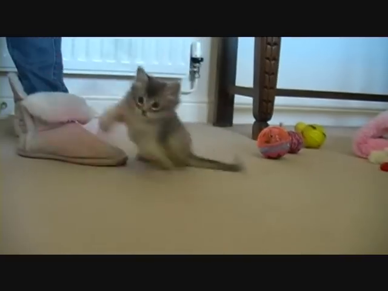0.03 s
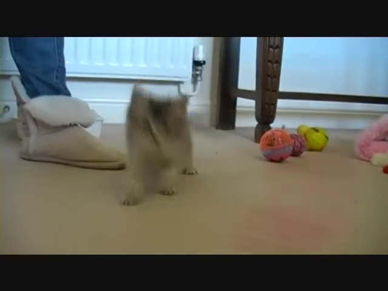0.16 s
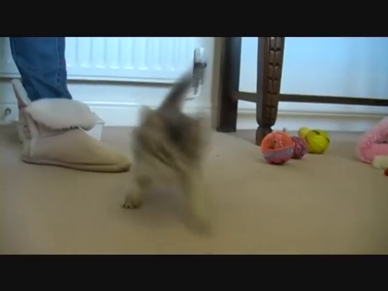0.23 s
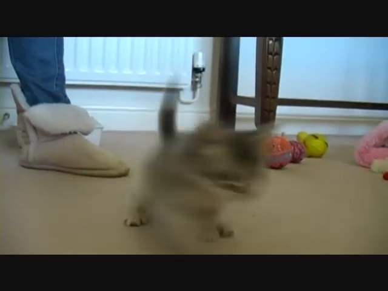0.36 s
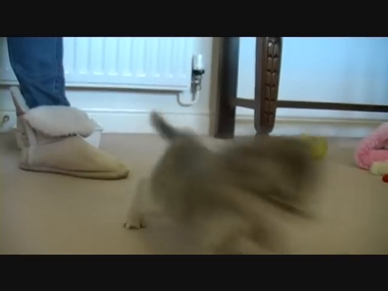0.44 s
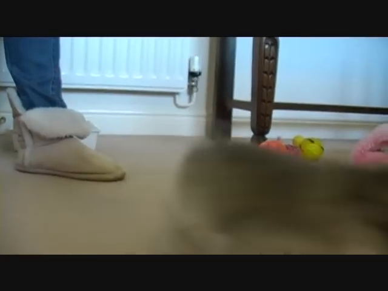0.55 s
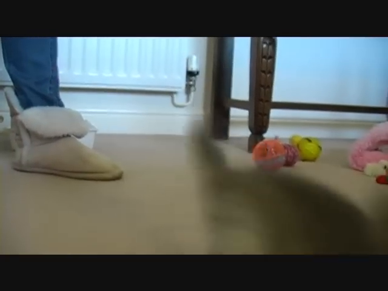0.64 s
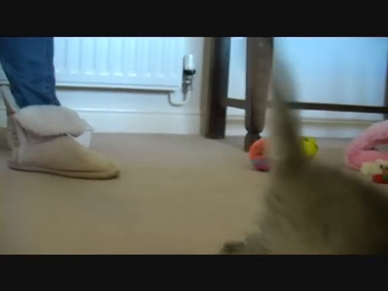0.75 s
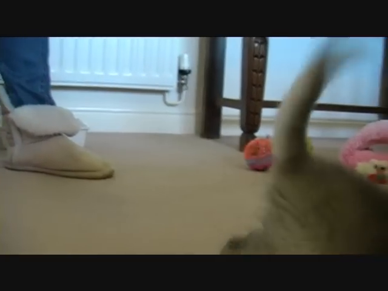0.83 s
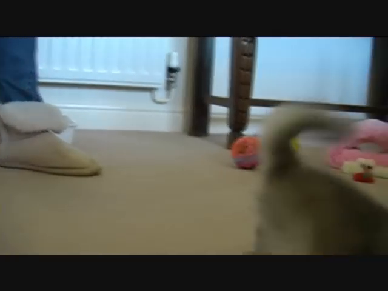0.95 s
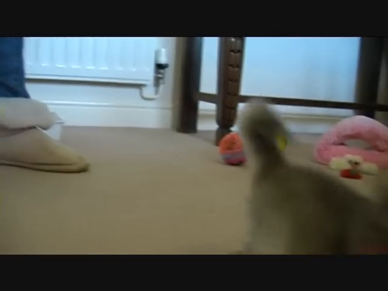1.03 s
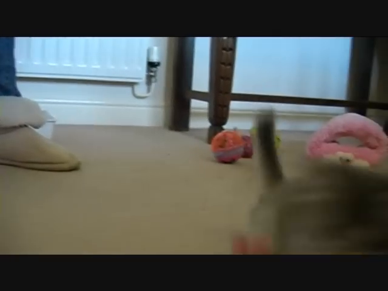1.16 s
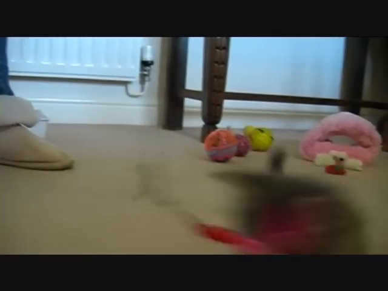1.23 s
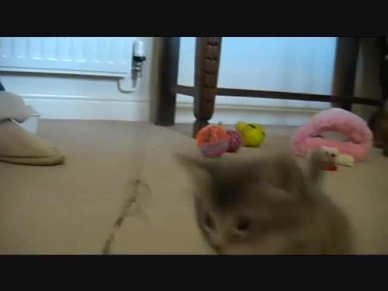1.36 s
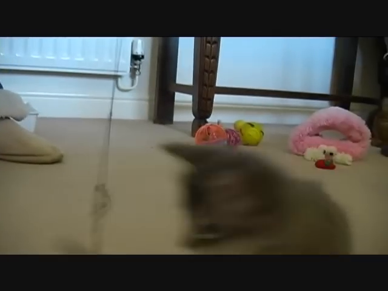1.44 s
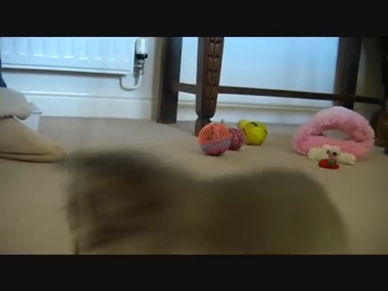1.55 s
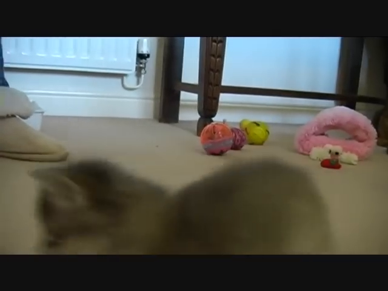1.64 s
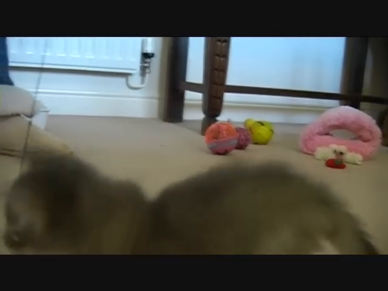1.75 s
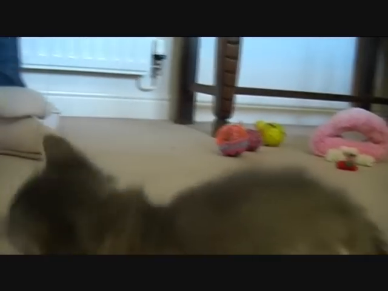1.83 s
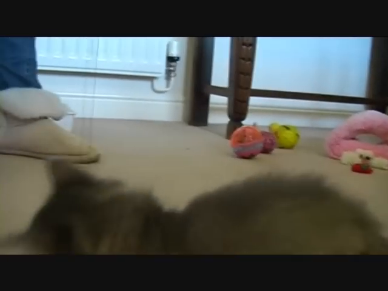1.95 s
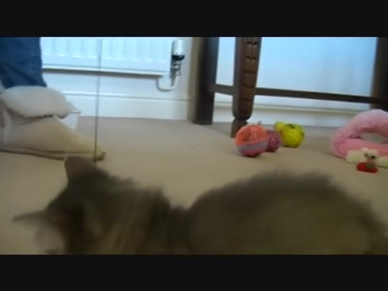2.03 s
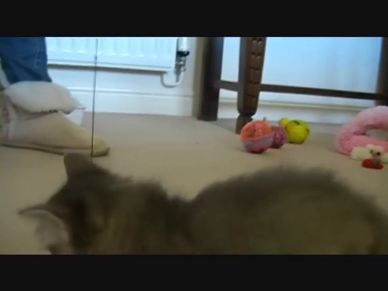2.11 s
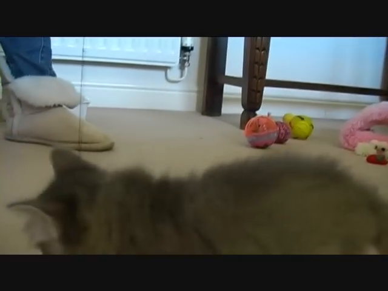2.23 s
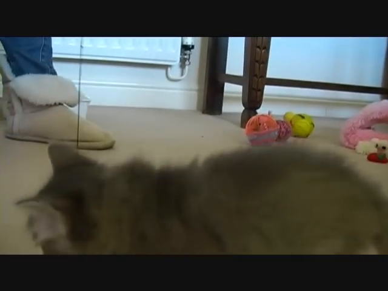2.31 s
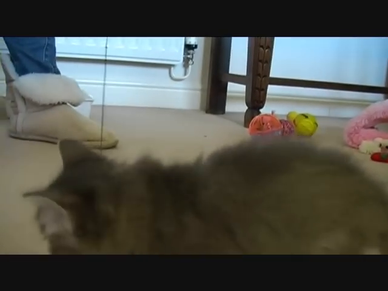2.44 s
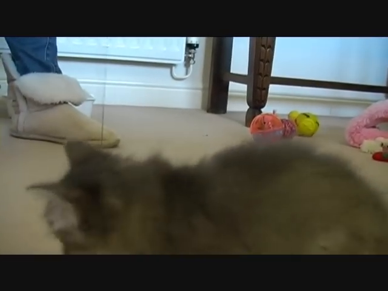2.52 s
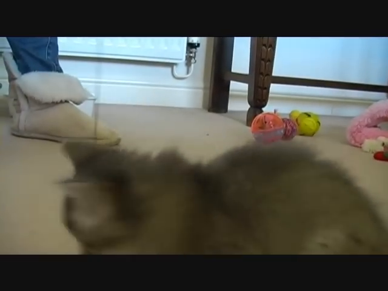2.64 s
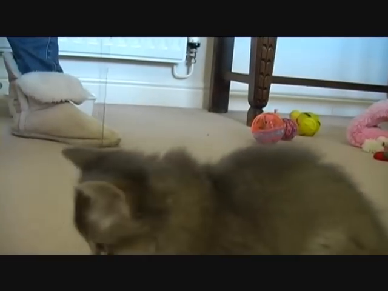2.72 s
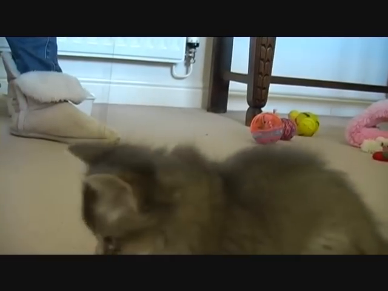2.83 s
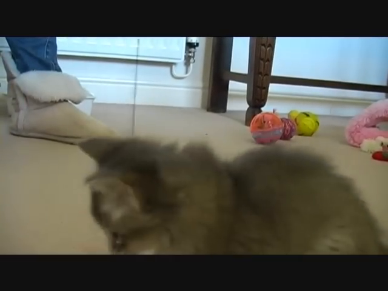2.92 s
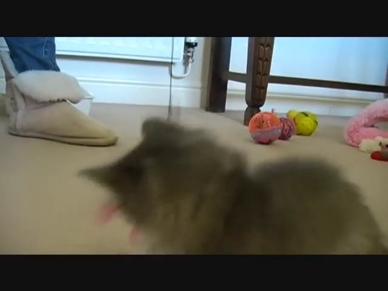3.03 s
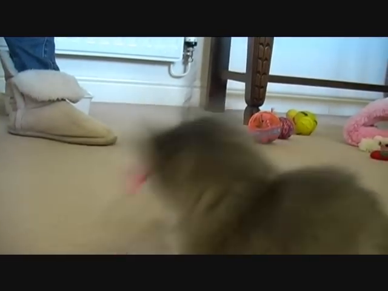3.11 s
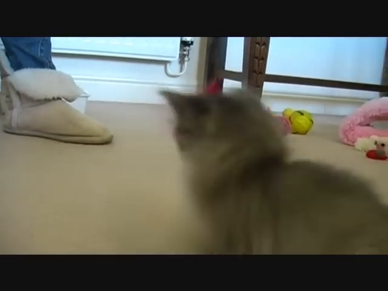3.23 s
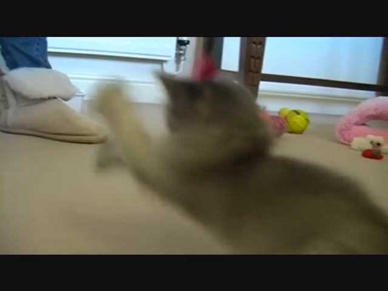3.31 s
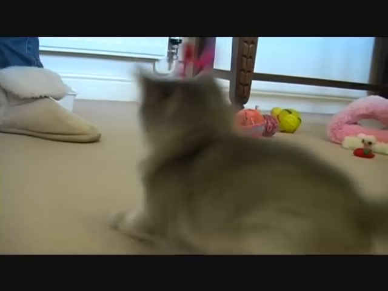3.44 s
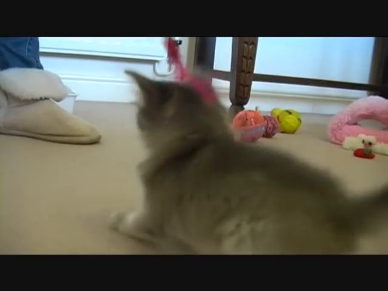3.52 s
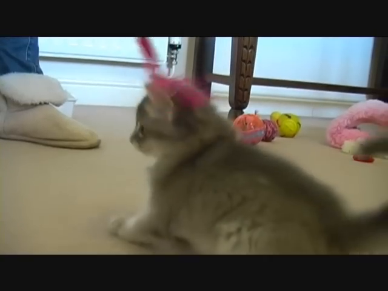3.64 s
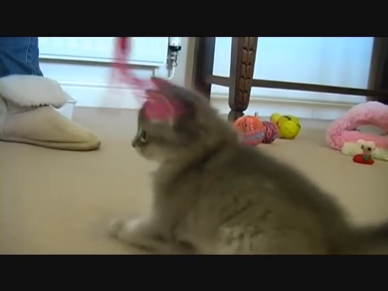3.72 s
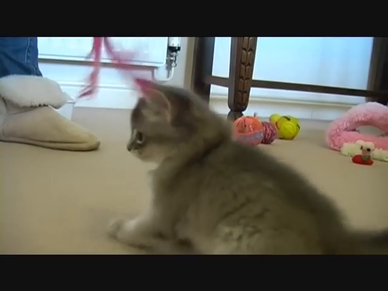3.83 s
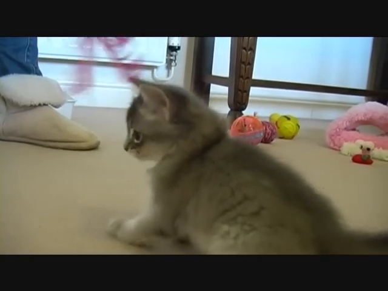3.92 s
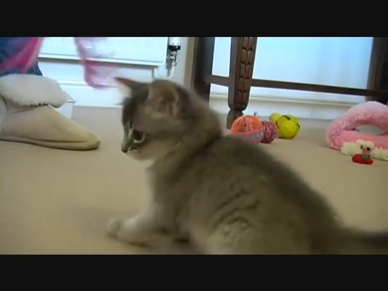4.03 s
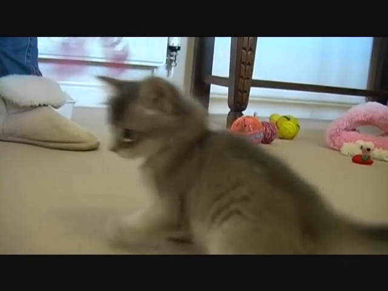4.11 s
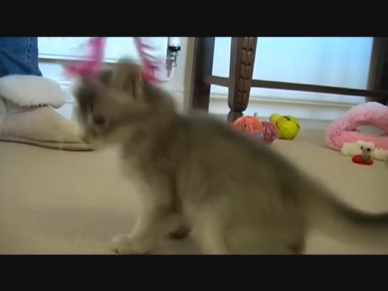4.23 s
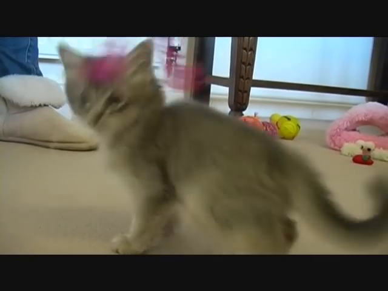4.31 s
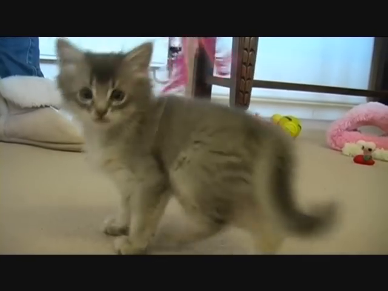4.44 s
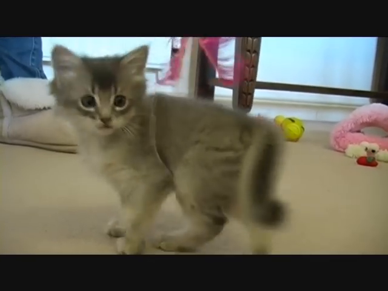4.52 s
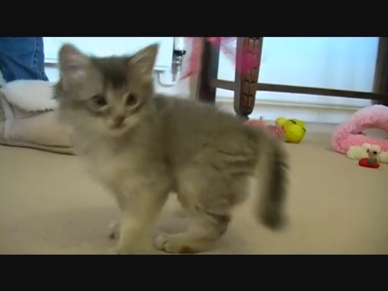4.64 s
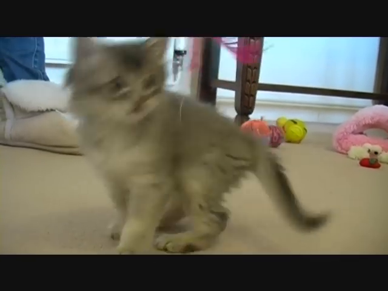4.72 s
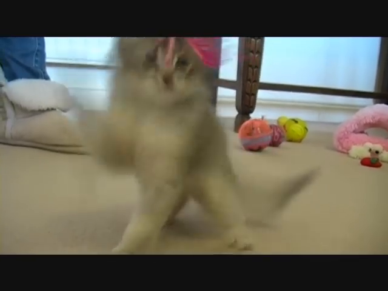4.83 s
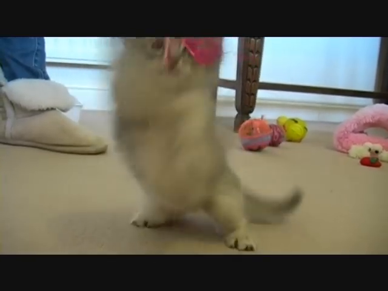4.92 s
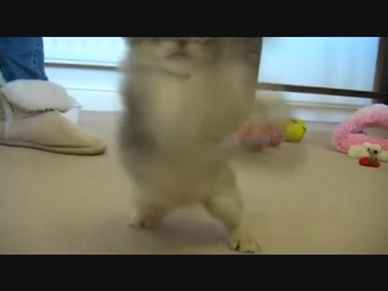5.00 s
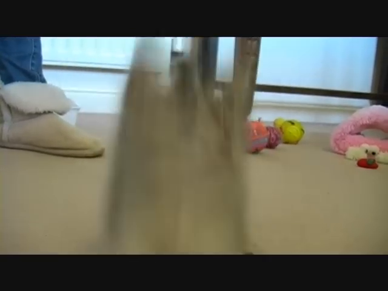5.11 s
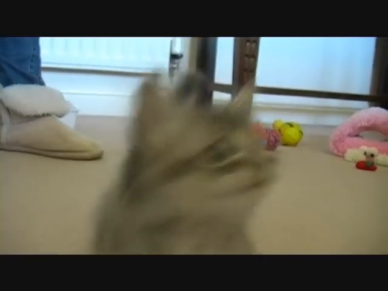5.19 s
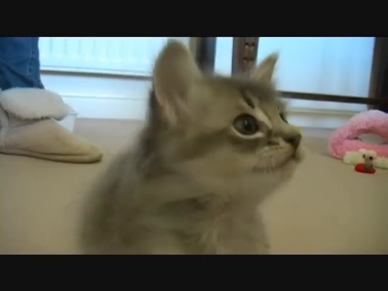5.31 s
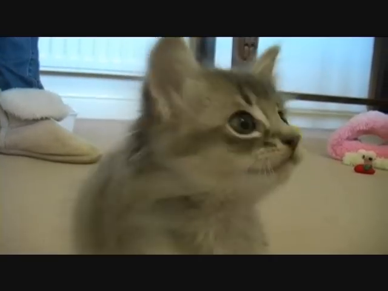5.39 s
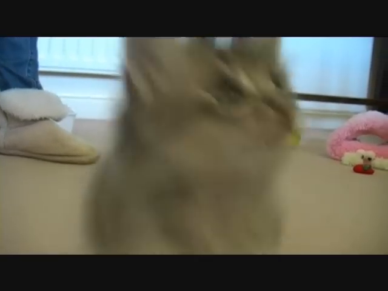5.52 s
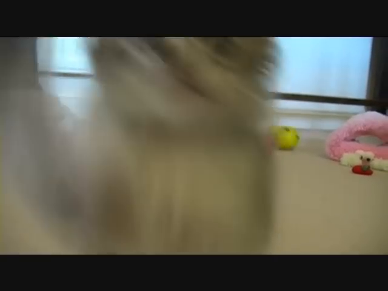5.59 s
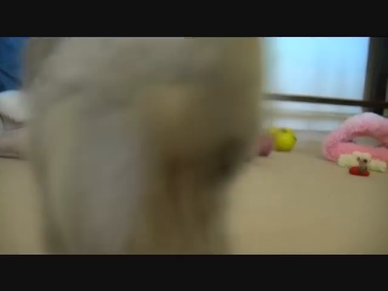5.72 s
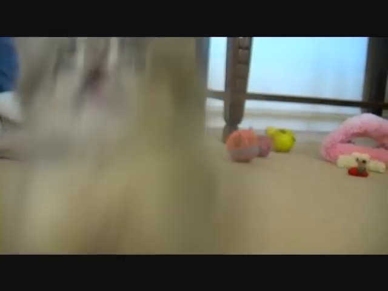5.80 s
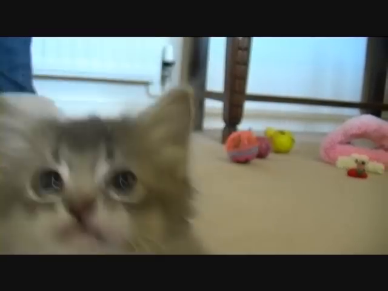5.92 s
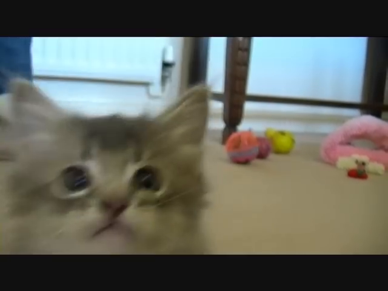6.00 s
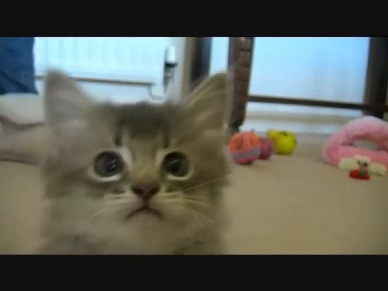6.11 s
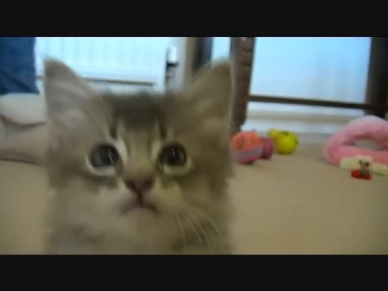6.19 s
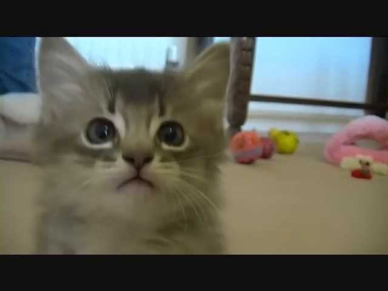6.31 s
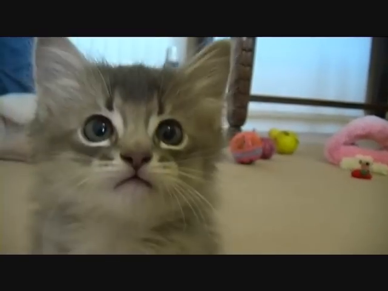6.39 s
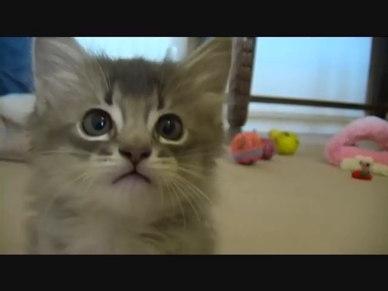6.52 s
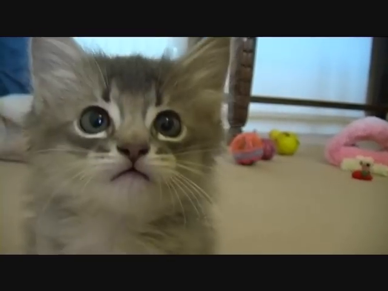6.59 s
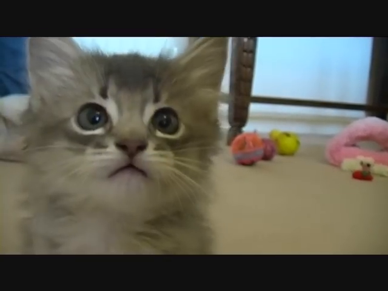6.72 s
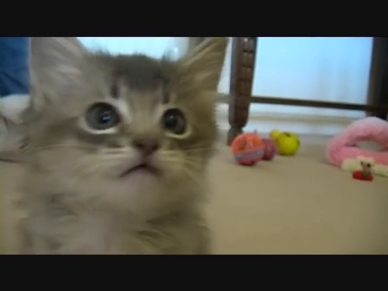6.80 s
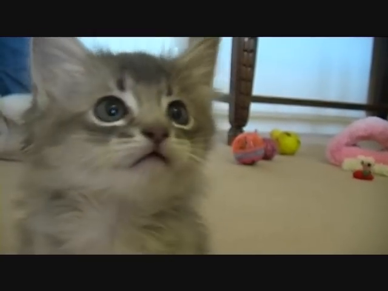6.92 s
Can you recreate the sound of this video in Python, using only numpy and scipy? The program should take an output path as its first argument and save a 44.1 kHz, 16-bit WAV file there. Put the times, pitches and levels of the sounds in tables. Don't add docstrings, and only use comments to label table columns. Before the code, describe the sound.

A constant low motor hum, with a comb of faint thin whines, floor rumble and soft hiss, runs throughout; the whines swell slightly around 1-2 seconds. From 0 to 0.6 seconds a feather toy flicks in airy rustles while paws thump softly on carpeted boards. At 0.7-0.8 a tumbling cluster of heavy, damped thuds, slaps, scuffs and sharp claw ticks lands. A thump comes at 1.0, then scuffling at 1.3 and a scratchy burst of ticks and fur swishes from 1.6 to 1.75. Faint pats and brushing follow until 3.1. One firm thud sounds at 3.5, then mostly hum with slight brushes. A thump at 4.95 precedes a very sharp click at 5.02, and a double heavy landing hits at 5.2. Light steps and scuffs at 5.6-5.8 lead to a strong slap at 5.94, small pats until 6.2, then only hum and hiss until 7. Close, indoor, briefly reverberant.

```python
import sys
import numpy as np
from scipy import signal
from scipy.fft import rfft, irfft, next_fast_len
from scipy.io import wavfile
from scipy.ndimage import map_coordinates

SR = 44100
rng = np.random.default_rng(int(sys.argv[2]) if len(sys.argv) > 2 else 0)


def dump(signal):
    limited = np.clip(np.atleast_2d(signal).T, -1, 1)
    pcm = np.round(limited * 32767).astype(np.int16)
    wavfile.write(sys.argv[1], SR, pcm)


def ratio_of_db(decibels):
    return 10 ** (np.asarray(decibels, float) / 20)


N = 306495


def unit(x):
    return x / np.sqrt(np.mean(x ** 2) + 1e-20)


def along(points, hz):
    f, v = np.transpose(points)
    return np.interp(np.log(hz + 1), np.log(f + 1), v)


def curves(rows):
    s, *cols = np.transpose(rows)
    return [np.interp(np.arange(N) / SR, s, c) for c in cols]


def wobble(rate):
    steps = np.arange(0, N + 16, 16)
    knots = rng.standard_normal(int(N * rate / SR) + 4)
    return np.interp(np.arange(N), steps, map_coordinates(knots, [steps * rate / SR]))


def filtered(x, response):
    m = next_fast_len(N + SR // 2)
    return irfft(rfft(x, m) * response(np.fft.rfftfreq(m, 1 / SR)), m)[..., :N]


def rush(spectrum, alike, lumps=1):
    def shape(hz):
        turn = np.arccos(np.clip(along(alike, hz), -1, 1)) / 2
        return ratio_of_db(along(spectrum, hz)) * [np.cos(turn), np.sin(turn)]

    mid, side = filtered(lumps * rng.standard_normal((2, N)), shape)
    return unit(np.array([mid + side, mid - side]))


def add(track, s, sound, pan_db=None):
    part = track[:, round(s * SR):][:, :sound.shape[-1]]
    balance = 1 if pan_db is None else ratio_of_db([[pan_db / 2], [-pan_db / 2]])
    part += sound[..., :part.shape[1]] * balance


# frequency in Hz, density in dB per Hz.
RUMBLE = [(15, -59), (28, -21), (50, -11), (84, -14), (101, -3), (119, -5), (138, -14), (167, -13),
          (187, -7.5), (212, -12), (266, -14), (305, -10), (374, -9), (420, -15), (484, -14.5), (534, -17),
          (570, -19.5), (1200, -37), (1560, -50), (2640, -120)]
# frequency in Hz, left-right likeness from -1 to 1.
RUMBLE_ALIKE = [(60, 1), (130, 0.51), (290, 0.23), (640, 0.096), (1200, -0.14)]
# frequency in Hz, density in dB per Hz.
HISS = [(350, -46), (600, 1), (1480, -1), (1720, -2), (2110, -3), (3790, -6), (4530, -6.5), (4980, -9),
        (6730, -8), (9090, -11), (15700, -13.5)]
# frequency in Hz, left-right likeness from -1 to 1.
HISS_ALIKE = [(600, -0.26), (1400, 0.027), (3100, -0.0045), (6800, 0.24), (15000, 0.17)]
# time in seconds, level in dB.
RUSTLE = [(0.0, -48), (0.71, -50.5), (1.24, -54.5), (1.62, -49.5), (2.09, -50.5), (2.75, -56.5),
          (3.04, -53), (3.52, -62.5), (5.13, -52), (5.4, -54), (5.85, -53), (5.98, -58.5), (6.56, -58),
          (6.95, -60)]
RUMBLE_DB, HISS_DB = -47, -46
RUMBLE_FOLLOWS, HISS_FOLLOWS = 0.23, 0.11


def background():
    play_db = curves(RUSTLE)[0]
    play_db = play_db - play_db.mean()
    rumble_db = RUMBLE_DB + RUMBLE_FOLLOWS * play_db + 1.2 * wobble(14)
    hiss_db = HISS_DB + HISS_FOLLOWS * play_db + 0.11 * wobble(4.2)
    return ratio_of_db(rumble_db) * rush(RUMBLE, RUMBLE_ALIKE) + ratio_of_db(hiss_db) * rush(HISS, HISS_ALIKE)


# multiple of twice the drum speed, rms level in dB,
# left-right difference in dB, share in the load surges from 0 to 1.
WHINE = [(9, -74.5, -1, 0.35), (10, -78, -10, 0), (11, -72.5, -4, 0), (13, -74, -3, 0.054),
         (14, -72, -6, 0.1), (16, -65, -15.5, 0.041), (17, -60, -6.5, 0), (18, -64.5, -10.5, 0.53),
         (19, -70.5, -10, 0.44), (20, -72, -13, 0.57), (21, -72.5, -15, .1), (22, -76.5, -12, 0.59),
         (31, -74, 0, 0), (33, -83, -2, 0), (34, -76, -10, 0), (35, -77, 3, 0), (36, -76, -5, 0)]
# frequency in Hz, rms level in dB.
STRAY = [(4048, -73), (5230, -65.5), (11041, -76), (15623, -89)]
# time in seconds, level in dB.
SURGE = [(0, -5), (.9, -6), (1.1, 11), (1.9, 11), (2.2, -3), (3.2, -6), (3.7, -2), (4.2, 4), (4.7, 3),
         (5.2, 4), (5.8, 2), (6.3, -4), (6.95, -4)]
DRUM_HZ = 150.0


def drum():
    t = np.arange(N) / SR
    port_phase = np.array([[-1.1], [1.6]])
    hum = ratio_of_db([[-34], [-40]]) * np.sin(2 * np.pi * DRUM_HZ * t + port_phase)
    fluttered = t + 4e-5 * wobble(5) + 6e-6 * wobble(30)
    surge_db = curves(SURGE)[0] + 1.5 * wobble(3.83)
    lines = [(round(k) * 2 * DRUM_HZ, *rest) for k, *rest in WHINE]
    lines += [(hz, db, -1.5, 0) for hz, db in STRAY]
    out = hum * ratio_of_db(0.15 * wobble(4.9))
    for hz, db, pan_db, share in lines:
        tone = ratio_of_db(db + 2.5 + 0.9 * wobble(7.4)) * np.sin(2 * np.pi * hz * fluttered)
        out = out + [ratio_of_db(pan_db / 2) * tone, ratio_of_db(share * surge_db - pan_db / 2) * tone]
    return out


RISE_SHARE = 0.65


def strokes(rows):
    margin = SR // 5
    t = np.arange(-margin, margin) / SR
    gains = np.zeros((len(rows[0]) - 2, N + margin))
    for s, fall, *dbs in rows:
        pace = np.where(t < 0, RISE_SHARE * fall, fall)
        add(gains, s, ratio_of_db(dbs)[:, None] * ratio_of_db(-10 * np.abs(t / pace) ** 0.7))
    return gains[:, margin:]


# frequency in Hz, density in dB per Hz.
FEATHER = [(2500, -41), (4000, -0.5), (4800, 6), (5800, 3.5), (7000, -13), (10000, -28)]
# peak time in seconds, fall time in seconds, level in dB.
FLICKS = [
    (.07, 0.033, -51),
    (.185, .04, -51),
    (.29, .025, -55),
    (.42, 0.022, -49),
    (.52, .02, -54),
    (.655, .025, -48),
    (.89, 0.037, -50),
    (1.05, 0.028, -65),
    (3.13, 0.0097, -53),
]


def toy():
    rustle = ratio_of_db(curves(RUSTLE)[0] - 7.5 + 0.78 * wobble(25))
    barbs = rush(FEATHER, [(5000, 0.94)], lumps=ratio_of_db(2.7 * wobble(500)))
    return (rustle + strokes(FLICKS)[0]) * barbs


# frequency in Hz, density in dB per Hz.
FUR = [(290, -2), (500, -4), (686, 0.5), (851, -1.5), (1150, -6.5), (2040, -3), (2360, -4.5), (5000, -10),
       (7800, -10), (9000, -12), (15500, -10)]
# peak time in seconds, fall time in seconds, dull level in dB,
# body level in dB, bright level in dB.
SCUFF = [(.11, .03, -46, -55, -62), (.17, 0.046, -45, -50, -58), (.235, 0.029, -47.5, -56, -62),
         (.415, 0.012, -43, -51, -62), (.697, 0.003, -41, -46, -51), (.706, 0.0061, -45, -46, -52),
         (.7145, 0.0086, -39, -39, -47), (.7508, 0.003, -42, -31, -43), (0.7635, 0.003, -32, -38, -44),
         (.79, 0.07, -44.5, -46.5, -50), (1.263, 0.022, -42, -39.5, -45), (1.342, 0.025, -41.5, -43.5, -52),
         (1.601, 0.006, -47, -49, -42), (1.622, 0.026, -41, -40, -45), (1.70, 0.028, -47, -53, -44),
         (1.742, 0.017, -46, -59, -50), (2.243, 0.046, -44.5, -50, -59), (2.285, .04, -65, -55, -60),
         (2.325, .025, -51, -53, -60), (2.948, 0.014, -41, -42, -48), (2.961, 0.015, -43, -47, -49),
         (2.976, 0.017, -43, -44.5, -53), (3.0, 0.02, -59, -52, -55), (3.035, .02, -62, -56, -48),
         (3.075, 0.026, -57, -52, -60), (3.098, .025, -55, -51, -58), (3.509, 0.033, -45.5, -48, -65),
         (4.933, 0.012, -43, -37.5, -51), (4.946, 0.01, -38, -41.5, -50), (5.211, 0.018, -40, -42.5, -46),
         (5.625, 0.042, -45.5, -48, -49), (5.734, 0.015, -39, -42, -44), (5.95, 0.013, -44, -47, -53),
         (6.014, 0.027, -46, -43.5, -59), (6.148, 0.019, -47.5, -46, -53)]
# peak time in seconds, fall time in seconds, body level in dB.
BRUSH = [
    (.975, 0.01, -53),
    (1.015, 0.021, -49.5),
    (1.465, 0.026, -48),
    (1.81, 0.021, -54),
    (3.285, 0.048, -51.5),
    (4.24, 0.035, -52),
    (4.31, 0.027, -68),
    (4.37, 0.025, -52),
    (4.59, 0.038, -53),
    (5.104, 0.041, -49.5),
]
BRUSH_DULL_DB, BRUSH_BRIGHT_DB = 1, -8


def scuffs():
    clumps = ratio_of_db(1.7 * wobble(900) + 0.94 * wobble(120))
    swish = rush(FUR, [(500, 0.64), (3000, 0.62), (6500, 1.0), (14000, 0.48)], lumps=clumps)
    dull = filtered(swish, lambda hz: 1 / (1 + (hz / 3800) ** 6))
    lower = filtered(swish, lambda hz: 1 / (1 + (hz / 8400) ** 6))
    bands = unit(dull), unit(lower - dull), unit(swish - lower)
    brushes = [(s, fall, db + BRUSH_DULL_DB, db, db + BRUSH_BRIGHT_DB) for s, fall, db in BRUSH]
    return sum(gain * band for gain, band in zip(strokes(SCUFF + brushes), bands))


# start in seconds, peak level in dB, dull part in dB relative to the peak,
# bright part in dB relative to the peak, left-right difference in dB.
TICKS = [(0.0934, -31, 5, -20, -3), (0.6957, -21, -20, -22, -5), (0.748, -14, -12, -23, -10),
         (0.749, -28, -15, -22, -4), (0.7502, -18, -21, -14, -4), (0.7575, -21, -15, -22, -2),
         (0.762, -25, -15, -13, -2), (0.763, -18, -14, -14, -5), (0.7677, -30, -10, -8, -2),
         (1.6033, -23, -18, -12, -4), (1.6042, -24, -18, -11, -3), (1.6187, -26, -10, -11, 0),
         (2.4544, -44, -15, -1, -2), (1.6222, -24, 0, -16, 5), (1.6882, -23, -22, -12, -2),
         (1.7, -13, -25, -17, 3), (1.7014, -23, -20, -22, 0), (3.5059, -36, -8, -26, -0.5),
         (3.5663, -26, -25, -24, -1.5), (4.3805, -25, -15, -24, -1.5), (5.0198, -2, -20, -28, -0.5),
         (5.035, -15, -29, -27, -2), (5.193, -35, 4, -14, -14), (5.2105, -30, 8, -19, -0.5),
         (5.4284, -41, 13.5, -11, -14), (5.7293, -32, 2, -13, 0.5), (5.7404, -17, -11, -19, 4),
         (5.874, -27, 1.5, -25, 1), (5.9414, -32, 5, -17, 9)]
# start in seconds, peak level in dB.
NICKS = [(0.2793, -41), (0.7425, -30), (1.509, -32), (1.5524, -35), (1.6275, -29), (1.6395, -27),
         (1.649, -30), (1.6902, -33), (1.6932, -32), (1.7299, -24), (1.9495, -35), (2.0364, -37),
         (2.7294, -35), (2.77, -33), (5.0228, -23), (5.0312, -34), (5.1074, -44), (5.3044, -37),
         (5.331, -33), (5.6194, -46)]
# frequency in Hz, length in cycles.
SNAP = [(2300, .6), (5800, .8), (12800, 1.15)]
NICK_DULL_DB, NICK_BRIGHT_DB, NICK_PAN_DB = -19, -11, -2


def ticks():
    out, t = np.zeros((2, N)), np.arange(SR // 50) / SR

    def spike(hz, cycles):
        after = t - .0008
        return np.exp(-(after * hz / cycles) ** 2) * np.cos(2 * np.pi * hz * after - .5)

    dull, middle, bright = [spike(*row) for row in SNAP]
    rows = TICKS + [(s, db, NICK_DULL_DB, NICK_BRIGHT_DB, NICK_PAN_DB) for s, db in NICKS]
    for s, db, dull_db, bright_db, pan_db in rows:
        snap = middle + ratio_of_db(dull_db) * dull + ratio_of_db(bright_db + 16.5) * bright
        crackle = ratio_of_db(-19 - 60 * t / .016) * rng.standard_normal(len(t))
        fray = np.convolve(crackle, snap)[35:35 + len(t)] * (t > .0011)
        add(out, s + 0.00058, ratio_of_db(db - 6.0) * (snap + fray)[None], 1.4 * pan_db)
    return out


PRESS = 1.6


def ring(modes, t, near_hz, reach, travel, thud_db, thud_t60):
    hz, db, t60 = np.transpose([(near_hz, thud_db, thud_t60), *modes])[:, :, None]
    size, turn = rng.standard_normal((2, len(hz), 1))
    late = travel / np.sqrt(hz)
    db = db - 6 * (np.log2(hz / near_hz) / reach) ** 2 + 1.5 * size
    swell = np.sin(np.pi / 2 * np.clip(t / (PRESS * late), 0, 1)) ** 2
    tones = np.cos(2 * np.pi * hz * (t - late) + .25 * turn)
    x = (ratio_of_db(db - 60 * t / t60) * swell * tones).sum(0)
    return x / np.abs(x).max()


# start in seconds, level in dB, pitch in Hz,
# thud over ring in dB, spread of modes reached in octaves.
POUNCES = [(0.2521, -19.5, 179, 0, 0.23), (0.3527, -15, 149, 9, 0.24), (0.42, -21.5, 162, -3, 0.47),
           (0.4903, -17, 173.7, 8, 0.27), (0.704, -25, 120, -5, 0.43), (1.013, -19, 140, 9, 0.62),
           (1.319, -29, 259, 3, 0.27), (1.337, -34, 170, 4, 0.48), (1.3506, -23.5, 159, 10, 0.7),
           (1.385, -36, 170, 6, .4), (1.616, -23, 188, 3, 0.52), (3.5049, -13, 206.5, 13, 0.36),
           (3.521, -19, 153, 1, 0.15), (4.9573, -14.5, 183.5, 5, 0.29), (5.942, -19.5, 170, -1, 0.3)]
# start in seconds, level in dB,
# pitch in Hz, thud over ring in dB, spread of modes reached in octaves.
FLOPS = [(0.682, -13, 160, 9, 0.42), (0.747, -18, 125, 3, 0.35), (0.762, -10, 144, 8, 0.42),
         (0.776, -21, 110, 4, .4), (0.789, -18, 155, 6, 0.47), (0.804, -25, 105, 4, .4),
         (0.814, -23, 155, 4, 0.45), (5.194, -9.5, 162, 7.6, 0.54), (5.2065, -10.5, 244, 9, 0.21),
         (5.2153, -17.5, 183, 10, 0.32), (5.227, -15.5, 195, 6, 0.4), (5.2383, -22, 144, 6, 0.38),
         (5.256, -29, 230, 4, .3)]
# start in seconds, level in dB.
STEPS = [(0.087, -30.5), (0.115, -38), (0.168, -30), (0.208, -24.5), (0.231, -31), (0.409, -32),
         (0.653, -31), (0.716, -34), (0.842, -37), (1.153, -40), (1.221, -45), (4.493, -36), (4.823, -26.5),
         (4.855, -38), (4.94, -29), (5.276, -27), (5.325, -29), (5.371, -36), (5.604, -38), (5.727, -28),
         (5.814, -29.5), (5.961, -44), (5.984, -28), (6.02, -35), (6.158, -42)]
# start in seconds, level in
# dB.
ROLLS = [(0.705, -34), (0.744, -23), (0.775, -35), (0.86, -43), (0.899, -38), (0.936, -31), (1.014, -34),
         (1.152, -41), (1.345, -41), (3.38, -47), (0.353, -44), (0.491, -45), (1.615, -42), (4.958, -40),
         (5.197, -33), (5.212, -34), (5.603, -41), (5.689, -41), (5.725, -30.5), (5.817, -30.5),
         (5.882, -31.5)]
# frequency in Hz, level in dB, decay time T60 in seconds.
JOISTS = [(36, -4, .15), (56, -5, .4), (70, 0, .6), (84, -5, .35), (98, -6, .3)]
JOISTS_POUNCE_DB, JOISTS_STEP_DB = -34, -23


def joists():
    out, t = np.zeros((2, N)), np.arange(SR // 3) / SR
    loads = [(s, db + JOISTS_POUNCE_DB) for s, db, *_ in POUNCES + FLOPS]
    loads += [(s, db + JOISTS_STEP_DB) for s, db in STEPS]
    for s, db in loads + ROLLS:
        boom = ring(JOISTS, t, 70, 1.2, travel=.12, thud_db=-4, thud_t60=.12)
        add(out, s, ratio_of_db(db - 0.8) * boom[None], 1.3)
    return out


# frequency in Hz, level in dB, decay time T60 in seconds.
BOARD = [(124.2, 4.5, 0.33), (156.5, 1.5, 0.39), (180.4, -4.5, 0.21), (195, -2, 0.27), (228, 3.5, 0.093),
         (246.6, 4.5, 0.2)]
STEP_HZ, STEP_THUD_DB, STEP_REACH = 160.3, 13, 0.38
FLOP_RING = .65


def boards():
    out, t = np.zeros((2, N)), np.arange(SR // 3) / SR
    steps = [(s, db, STEP_HZ, STEP_THUD_DB, STEP_REACH) for s, db in STEPS]
    for rows, ring_share in [(POUNCES + steps, 1), (FLOPS, FLOP_RING)]:
        modes = np.multiply(BOARD, [1, 1, ring_share])
        for s, db, hz, thud_db, reach in rows:
            thump = ring(modes, t, hz, reach, travel=0.093, thud_db=thud_db + 4.0, thud_t60=.075)
            add(out, s, -ratio_of_db(db - 1.85) * thump[None], 1.3)
    return out


# start in seconds, level in dB, pitch in Hz,
# crisp edge in dB relative to the slap, edge pitch in Hz.
SLAPS = [(0.092, -33, 427, 7, 774), (0.212, -47.5, 352, 17, 890), (0.231, -48, 301, 14, 760),
         (0.254, -34, 444, 2, 634), (0.351, -31.5, 336, -5, 800), (0.406, -38, 460, 1, 600),
         (0.423, -37, 296, -20, 694), (0.491, -30, 425, 0, 614), (0.682, -31.5, 290, 5.5, 624),
         (0.708, -26, 310, -4, 745), (0.746, -18.5, 336, -8, 760), (0.764, -14, 336, -4, 587),
         (0.846, -28, 406, -7, 735), (1.319, -40.5, 296, 5, 550), (1.344, -35, 320, 6.5, 660),
         (1.357, -28, 310, -17, 557), (1.616, -30, 290, 13, 622), (1.625, -22, 377, -10, 604),
         (3.505, -21, 454, -1, 790), (4.958, -22, 342, -6.5, 523), (5.193, -12.5, 505, -9, 580),
         (5.210, -14.5, 477, 0, 617), (5.228, -29, 490, -11, 607), (5.727, -34, 395, -1, 814),
         (5.9402, -8.5, 347, -11, 733), (5.243, -38, 520, -5, 570), (3.412, -36, 440, -10, 600)]
# start in seconds, level in dB.
PATS = [(0.14, -50), (0.175, -53), (0.29, -44), (0.44, -44), (0.53, -45), (1.011, -40), (1.93, -38),
        (2.13, -40), (2.168, -34.5), (2.35, -36), (2.95, -48), (4.942, -37), (1.221, -41), (5.755, -37),
        (5.79, -42), (5.96, -34), (5.982, -32), (6.162, -37)]
# frequency in Hz, level in dB, decay time T60 in seconds.
PAD = [(310, -7, 0.37), (364, -1, 0.3), (425, 17, 0.094), (440, -13, 0.063), (500, 10, 0.19)]
# frequency in Hz, level in dB, decay time T60 in seconds.
EDGE = [(572, 5.5, 0.047), (651, -2, 0.12), (709, -1.5, 0.083), (853, -0.5, 0.06), (1008, 11.5, 0.017),
        (1204, 4.5, 0.031)]
PAT_HZ, PAT_EDGE_DB, PAT_EDGE_HZ = 359, -8, 750


def pads():
    out, t = np.zeros((2, N)), np.arange(SR // 7) / SR
    rows = SLAPS + [(s, db, PAT_HZ, PAT_EDGE_DB, PAT_EDGE_HZ) for s, db in PATS]
    for s, db, hz, edge_db, edge_hz in rows:
        slap = ring(PAD, t, hz, 0.3, travel=0.0638, thud_db=32.5, thud_t60=0.027)
        edge = ring(EDGE, t, edge_hz, 0.88, travel=0.052, thud_db=11.0, thud_t60=0.033)
        add(out, s, -ratio_of_db(db - 2.5) * (slap - ratio_of_db(edge_db) * edge)[None], 1.1)
    return out


# frequency in Hz, lead in radians.
LEAD = [(60, 0.11), (200, 0.64), (500, 1), (1200, 0.9), (4000, .3)]


def paws():
    landings = joists() + boards() + pads()
    return filtered(landings, lambda hz: np.exp(.5j * along(LEAD, hz) * [[1], [-1]]))


# frequency in Hz, decay time T60 in seconds.
WALLS = [(100, 0.35), (1000, 0.52), (10000, 0.022)]


def walls(x):
    hz, t, z = signal.stft(rng.standard_normal((2, SR // 2)), SR, nperseg=256)
    decay = ratio_of_db(-60 * t / along(WALLS, hz)[:, None])
    tail = signal.istft(z * decay, SR, nperseg=256)[1]
    delayed = np.pad(x, ((0, 0), (300, 0)))
    return signal.fftconvolve(delayed, tail / np.linalg.norm(tail[0]), axes=1)[:, :N]


def scene():
    steady = background() + drum()
    friction = toy() + scuffs()
    claws, thumps = ticks(), paws()
    echo = walls(ratio_of_db(-22) * thumps + ratio_of_db(-18) * claws)
    return steady + friction + claws + thumps + echo


# start in seconds, end in seconds.
FOLDED = [
    (.22, .665),
    (.82, 1.25),
    (1.44, 1.54),
    (1.755, 2.15),
    (2.99, 3.04),
    (3.83, 3.88),
    (4.05, 5.335),
    (5.377, 5.47),
    (5.53, 5.806),
    (5.85, 6.285),
]
# frequency in Hz, share of patches from 0 to 1.
SPARED = [(4700, .75), (5800, .5), (7000, .15), (10000, .05)]
FOLD_HZ, FOLD_DB = 4700, 1.8


def fold(pair):
    mid_side = np.array([pair[0] + pair[1], pair[0] - pair[1]]) / 2
    hz, t, z = signal.stft(mid_side, SR, nperseg=1024)
    patches = rng.random((len(hz) // 8 + 1, len(t) // 2 + 1))
    luck = np.kron(patches, np.ones((8, 2)))[:len(hz), :len(t)]
    in_span = sum((t > a) & (t < b) for a, b in FOLDED)
    folded = in_span * (hz[:, None] > FOLD_HZ) * (luck > along(SPARED, hz)[:, None])
    mid, side = signal.istft(z * [ratio_of_db(FOLD_DB * folded), 1 - folded], SR, nperseg=1024)[1][:, :N]
    return np.array([mid + side, mid - side])


def low_pass(x):
    return signal.sosfilt(signal.butter(12, 16660, fs=SR, output="sos"), x)


def record(dry):
    heard = filtered(dry, lambda hz: hz ** 2 / (hz ** 2 + 35 ** 2))
    kept = filtered(fold(heard), lambda hz: np.clip((15870 - hz) / 150, .003, 1))
    return low_pass(kept)


dry = scene()
out = record(dry)
dump(out)
```